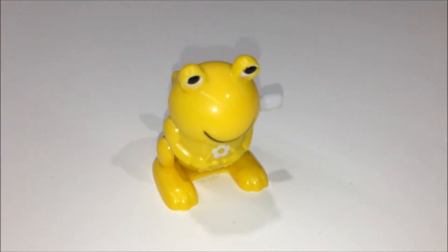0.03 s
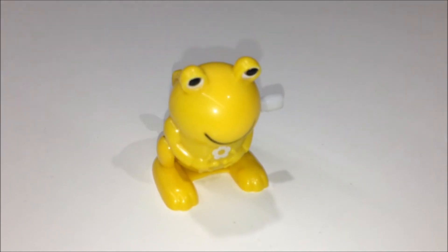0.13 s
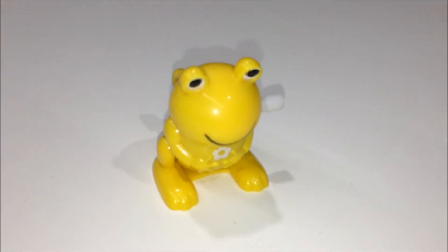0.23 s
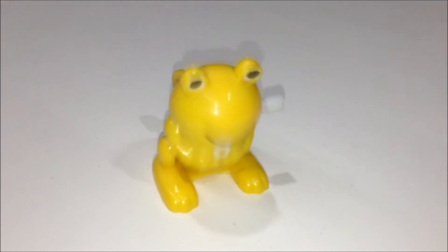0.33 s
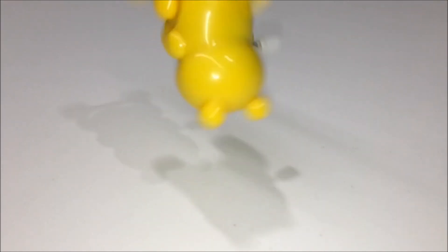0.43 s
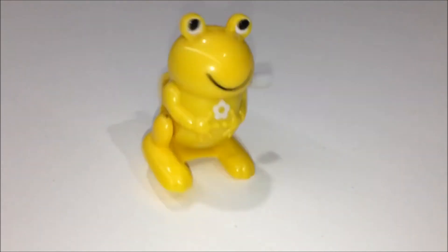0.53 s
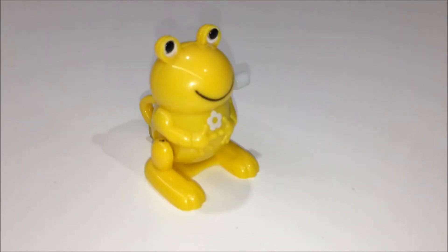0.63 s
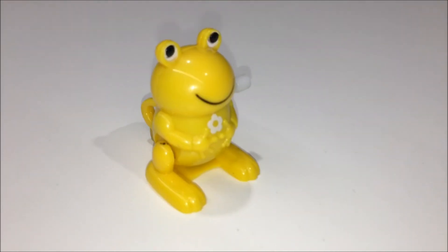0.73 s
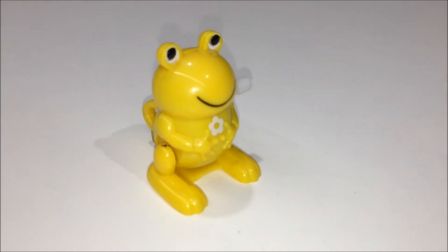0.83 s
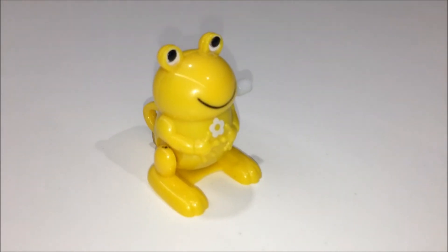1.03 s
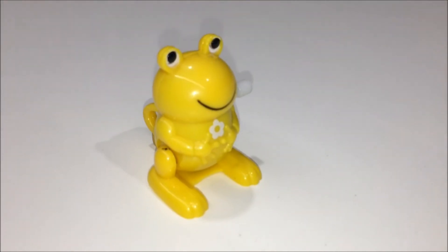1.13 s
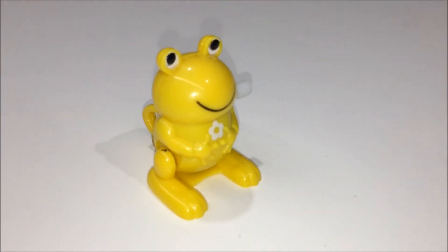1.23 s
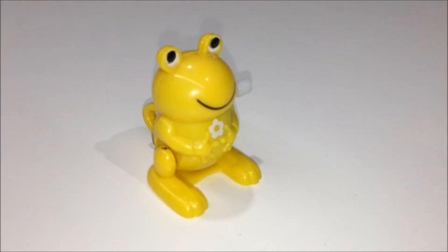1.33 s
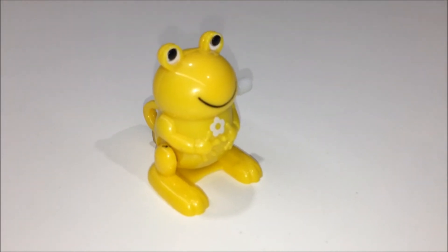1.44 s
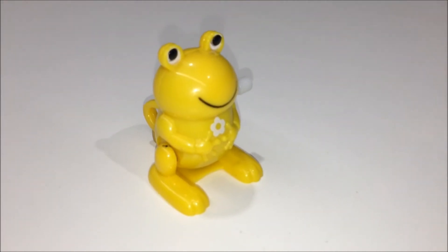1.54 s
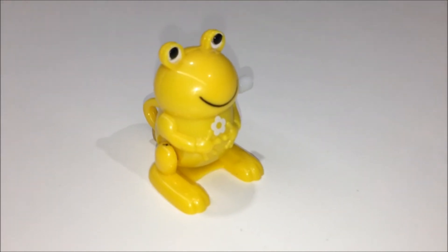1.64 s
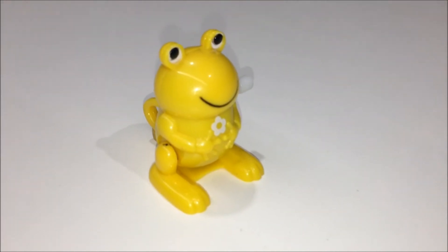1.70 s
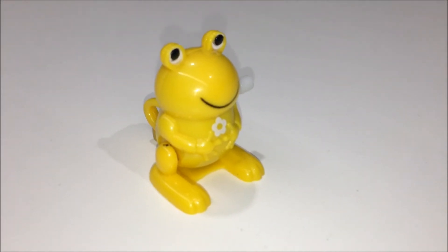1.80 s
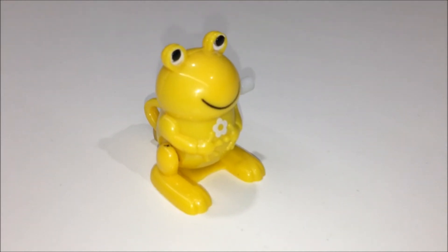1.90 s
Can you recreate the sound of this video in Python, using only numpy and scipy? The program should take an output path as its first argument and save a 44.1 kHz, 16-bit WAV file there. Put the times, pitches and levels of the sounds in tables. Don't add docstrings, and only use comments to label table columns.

```python
import sys
import numpy as np
from scipy import signal
from scipy.io import wavfile
from scipy.ndimage import uniform_filter1d, map_coordinates

SR = 44100
rng = np.random.default_rng(int(sys.argv[2]) if len(sys.argv) > 2 else 0)


def ratio(d):
    e = np.asarray(d, float) / 20
    return 10 ** e


def store_pcm(level_fs):
    pcm = np.round(np.clip(level_fs, -1, 1) * 32767).astype(np.int16)
    wavfile.write(sys.argv[1], SR, np.atleast_2d(pcm).T)


N = 85995

# time in seconds, teeth per second.
TOOTH_RATE = [(0, 295), (.06, 345), (.18, 410), (.25, 475), (.37, 560), (.48, 650), (.8, 700), (.93, 742),
              (1.1, 705), (1.46, 690), (1.53, 540), (1.6, 405), (1.75, 330), (1.82, 275), (1.95, 210)]
# time in seconds, level in dB.
WHIRR_LEVEL = [(0, -40.5), (.07, -38), (.2, -35), (.36, -31.5), (.43, -30.5), (.51, -29), (.57, -31.5),
               (.66, -30.5), (.82, -31), (.9, -29.5), (1.2, -29.5), (1.47, -30.5), (1.53, -34.5),
               (1.58, -38), (1.75, -40), (1.83, -44), (1.95, -47.5)]
# centre in Hz, width in Hz, then level in dB when crouched,
# when upright and when the spring is loaded.
SHELL_MODES = [(1140, 303, -17.5, -11.5, -25), (1920, 520, -10, -4.5, -10.5), (3350, 810, -4, -7.5, -7.5),
               (4240, 390, 1.5, -3, -2.5), (5378, 980, -6, -5.5, -1.5), (6780, 1100, -5.5, -4, -4),
               (7520, 530, -0.5, -8.5, -12), (8080, 490, -5.5, -2.5, -5), (8930, 760, -2.5, -0.5, -2.5),
               (9760, 700, -7.5, -11, -7), (11184, 700, -3.5, -2.5, -4), (12100, 610, -5, -11.5, -3),
               (13340, 770, -2.5, -1.5, -2.5), (15540, 850, -21, -1.5, -5)]
# start in seconds, peak in dB, centre in Hz, ring (60 dB decay) in seconds.
KNOCKS = [(.5115, -20, 4800, .008), (.5105, -24, 1800, .016), (.5205, -12, 8500, .006),
          (.5212, -12, 8500, .003), (.5210, -21, 1900, .012), (.5228, -10, 11000, .002),
          (.5236, -11, 11500, .008), (.5240, -24, 1900, .012), (.5254, -12, 9000, .008),
          (.5273, -15, 13500, .008), (.6568, -17, 7200, .016), (.6682, -12, 1800, .011),
          (.6688, -5, 12500, .006), (.6708, -2, 10500, .004), (.6712, -14, 4200, .008),
          (.6717, -6, 8800, .008), (.6732, -7, 8600, .008), (.6735, -15, 1900, .012),
          (.6746, -5, 7000, .005), (.7150, -27, 1800, .016), (.7376, -19, 3800, .011),
          (.7378, -24, 1900, .03), (.7617, -10, 7800, .004), (.7618, -18, 12500, .004),
          (.7625, -30, 1900, .02), (.7895, -23, 5400, .012), (.5213, -29, 1050, .03),
          (.5220, -36, 590, .06), (.7640, -35, 1100, .06), (.6690, -18, 2600, .01)]
# start in seconds, length in seconds, level in dB.
RATTLES = [
    (.5203, .0082, -24),
    (.6682, .0072, -17),
]
# frequency in Hz, level in dB, 60 dB decay time in seconds.
TABLE_MODES = [(67, -8, 0.2), (125, -14.5, 0.17), (167.4, -5, 0.51), (187.6, -2, 0.62), (223.5, -12, 0.41),
               (280.4, -4.5, 0.38), (340, -2, 0.43), (356.2, -5.5, 0.3), (427.4, -2.5, 0.18),
               (490, -13, 0.16), (557.2, 1, 0.17), (717, 2.5, 0.064), (857, -12, 0.2), (1086, 0, 0.063)]
# start in seconds, level in dB, contact time in seconds.
TABLE_BLOWS = [
    (.5105, -52, .0008),
    (.5215, -56, .0003),
    (.6680, -28, .0004),
    (.6755, -30, .001),
    (.7150, -40, .003),
    (.7378, -44, .003),
    (.7617, -42, .002),
    (.7895, -44, .004),
]
# frequency in Hz, level in dB.
RUMBLE_SPECTRUM = [(15, -45), (25, -18.5), (129, -9.5), (170, -0.5), (415, -17), (476, -23.5), (626, -8),
                   (694, -20), (1500, -14.5), (1950, -45), (3300, -120)]

LEAP_S, LOAD_S, TURN_S = 0.51, 1.52, 0.036
TAKEOFF_S, LAND_S = .522, .668
HOP_PATH_M, MIRROR_DB = .07, -11
TOOTH_S, TOOTH_JITTER, TOOTH_SCATTER_DB = .0006, .05, 2
WEAK_TOOTH_DB = -4
RUB_DB, RUB_PER_OCTAVE_DB = -10, 4
BRIGHTEN_DB = 2
RISE = 1.022
PLAIN_DB, PLAIN_HZ = -17, 3600
KNOCK_Q, GRIT = 3, .9
RATTLE_LOW_HZ, RATTLE_FADE_S = 2500, .0008
ECHO_DB, ECHO_T60_S = -12.5, 0.083
RUMBLE_DB = -51
CEILING, TOP_HZ = .95, 15710


def level(x, db):
    return x * ratio(db) / np.sqrt(np.mean(x ** 2))


def band(x, hz, width):
    return signal.lfilter(*signal.iirpeak(min(hz, .45 * SR), hz / width, fs=SR), x)


def highpass(x, order, hz):
    return signal.sosfilt(signal.butter(order, hz, "high", fs=SR, output="sos"), x)


def curve(table):
    return np.interp(np.arange(N) / SR, *np.array(table, float).T)


def walk(rate):
    hold = int(SR / rate)
    steps = np.repeat(rng.standard_normal(N // hold + 1), hold)
    return 1.3 * uniform_filter1d(uniform_filter1d(steps, hold), hold)[:N]


def gears():
    speed = curve(TOOTH_RATE)
    teeth_passed = np.cumsum(speed * (1 + 0.011 * walk(25))) / SR
    count = int(teeth_passed[-1])
    tooth = np.arange(count)
    jitter, scatter = rng.standard_normal((2, count))
    at = np.interp(tooth + TOOTH_JITTER * jitter, teeth_passed, np.arange(N)).astype(int)
    fast = np.clip(speed[at] / 350 - 1, 0, 1)
    hits = np.zeros(N)
    hits[at] = ratio(TOOTH_SCATTER_DB * scatter + WEAK_TOOTH_DB * fast * (tooth % 2))
    scratches = signal.lfilter([1], [1, -np.exp(-1 / (TOOTH_S * SR))], hits)
    octaves = np.log2(speed / 350)
    rubbing = ratio(RUB_DB + RUB_PER_OCTAVE_DB * octaves)
    body = shell(scratches + rubbing, octaves - .5)
    body = body / np.sqrt(uniform_filter1d(body ** 2, size=4000))
    return body * ratio(curve(WHIRR_LEVEL) + 0.22 * walk(19.9))


def shell(gate, octaves):
    t = np.arange(N) / SR
    upright = 1 / (1 + np.exp(-(t - LEAP_S) / TURN_S))
    loaded = 1 / (1 + np.exp(-(t - LOAD_S) / TURN_S))
    out = ratio(PLAIN_DB) * highpass(gate * rng.standard_normal(N), 2, PLAIN_HZ)
    for hz, width, crouched_db, upright_db, loaded_db in SHELL_MODES:
        scratch = gate * rng.standard_normal(N)
        low = band(band(scratch, hz / RISE, width), hz / RISE, width)
        high = band(band(scratch, hz, width), hz, width)
        ring = np.sqrt(1 - upright) * low + np.sqrt(upright) * high
        posture_db = crouched_db + upright * (upright_db - crouched_db) + loaded * (loaded_db - upright_db)
        bright_db = BRIGHTEN_DB * octaves * np.log2(hz / 6000)
        out = out + ring * ratio(posture_db + 1.2 * walk(8.8) + bright_db)
    return out


def hop(x):
    u = np.clip((np.arange(N) / SR - TAKEOFF_S) / (LAND_S - TAKEOFF_S), 0, 1)
    height = 4 * u * (1 - u)
    delay = height * HOP_PATH_M / 343 * SR
    mirrored = map_coordinates(x, [np.arange(N) - delay], mode="mirror")
    share = ratio(MIRROR_DB) * np.minimum(4 * height, 1)
    return (x + share * mirrored) / np.sqrt(1 + share ** 2)


def knocks():
    out = np.zeros(N)
    t = np.arange(1500) / SR
    for start, db, hz, ring in KNOCKS:
        grit = level(band(rng.standard_normal(len(t)), hz, hz / KNOCK_Q), 0)
        tone = np.sin(2 * np.pi * hz * t) + GRIT * grit
        crack = tone * (1 - np.exp(-t * 1e4)) * ratio(-60 * t / ring)
        i = int(start * SR)
        out[i:i + len(t)] += crack * ratio(db) / np.abs(crack).max()
    for start, length, db in RATTLES:
        rattle = highpass(rng.standard_normal(len(t)), 1, RATTLE_LOW_HZ)
        fade = np.exp(-np.maximum(t - length, 0) / RATTLE_FADE_S)
        i = int(start * SR)
        out[i:i + len(t)] += ratio(db) * rattle * fade
    return out


def table():
    push = np.zeros(N)
    for start, db, contact in TABLE_BLOWS:
        length = int(contact * SR) + 2
        shape = np.sin(np.pi * np.arange(length) / (length - 1))
        i = int(start * SR)
        push[i:i + length] += ratio(db) * shape / shape.sum()
    out = np.zeros(N)
    for k, (hz, db, t60) in enumerate(TABLE_MODES):
        pole = np.exp(2j * np.pi * hz / SR - np.log(1000) / (t60 * SR))
        sign = (-1) ** k
        out += sign * ratio(db) * signal.lfilter([1], [1, -pole], push).imag
    return out


def echo(x):
    t = np.arange(12000) / SR
    tail = rng.standard_normal(len(t)) * ratio(-60 * t / ECHO_T60_S) * (t > .003)
    return ratio(ECHO_DB) * signal.fftconvolve(x, tail / np.sqrt(np.sum(tail ** 2)))[:N]


def room():
    spectrum_hz, spectrum_db = np.transpose(RUMBLE_SPECTRUM)
    out = 0
    for hz in 28 * 2 ** np.arange(0, 5.9, 1 / 3):
        db = np.interp(np.log(hz), np.log(spectrum_hz), spectrum_db) + walk(5.93)
        out = out + ratio(db) * band(band(rng.standard_normal(N), hz, hz / 3), hz, hz / 3)
    return level(out, RUMBLE_DB)


def scene():
    toy = hop(gears()) + knocks()
    return np.tile(toy + echo(toy) + table() + room(), (2, 1))


def band_limit(x):
    return signal.sosfilt(signal.butter(12, 17000, fs=SR, output="sos"), x)


def record(dry):
    soft = CEILING * np.tanh(dry / CEILING)
    top_cut = signal.ellip(16, .3, 72, TOP_HZ, fs=SR, output="sos")
    mix = signal.sosfilt(top_cut, soft)
    return band_limit(mix)


dry = scene()
out = record(dry)
store_pcm(out)
```